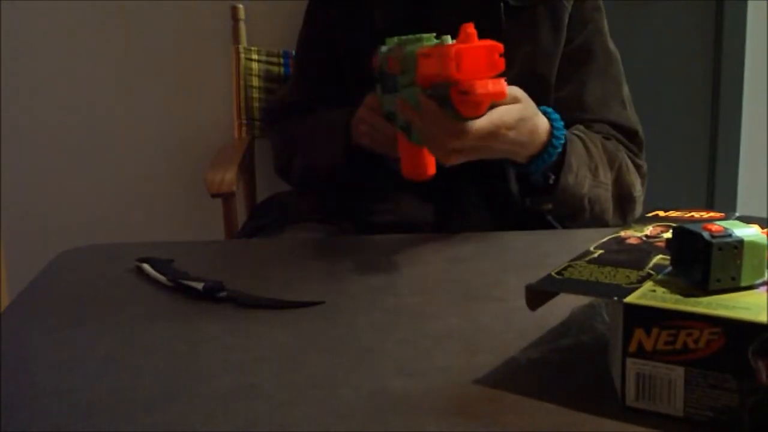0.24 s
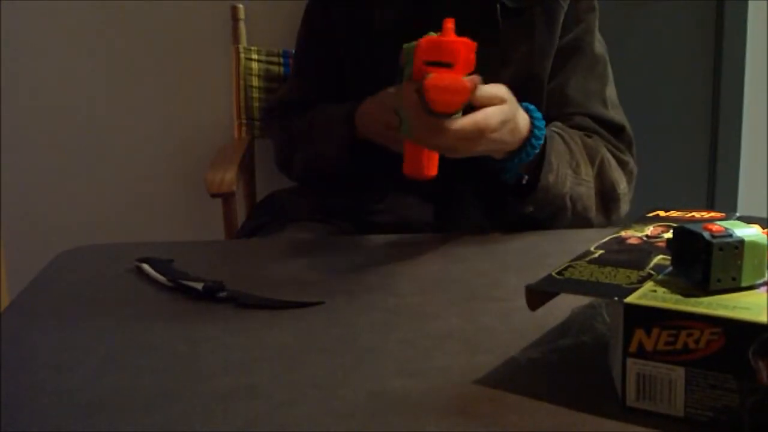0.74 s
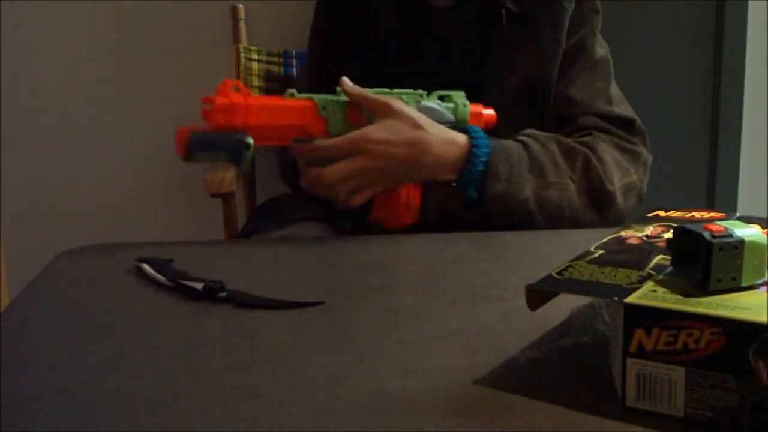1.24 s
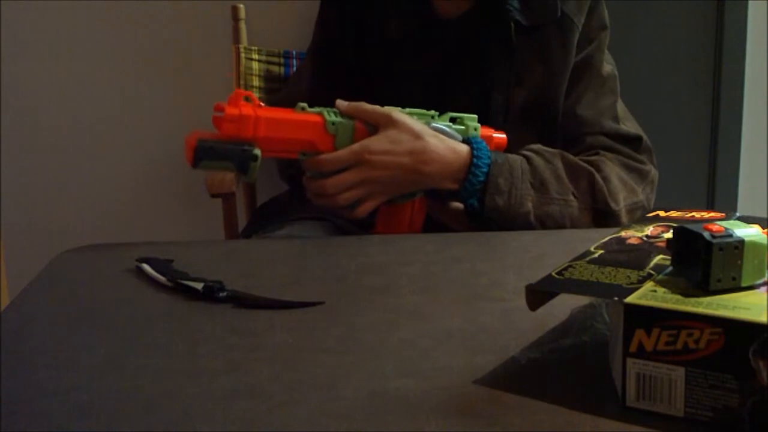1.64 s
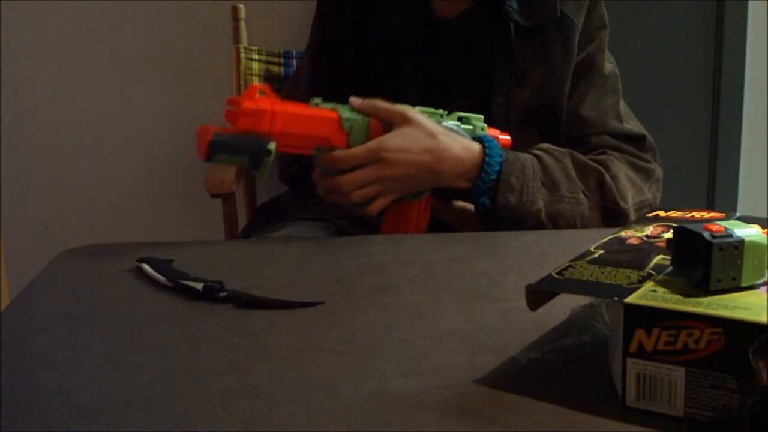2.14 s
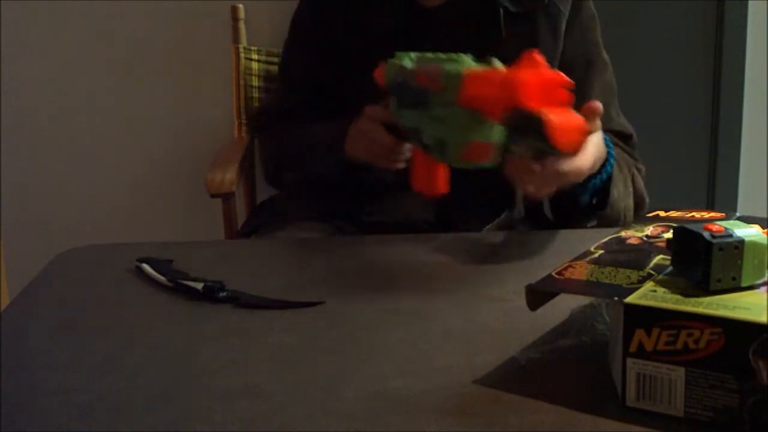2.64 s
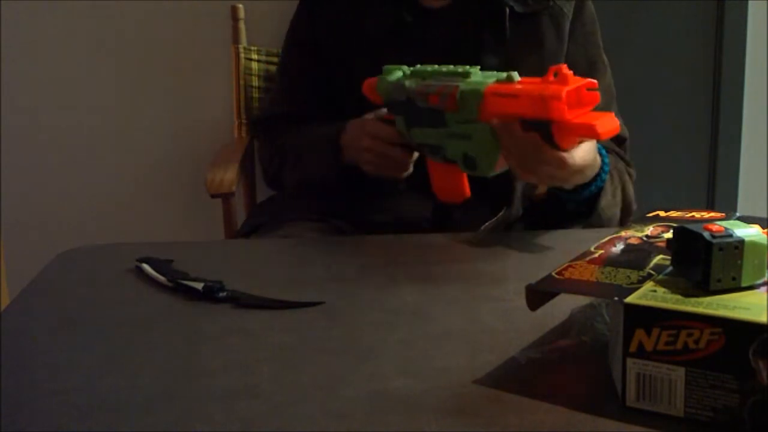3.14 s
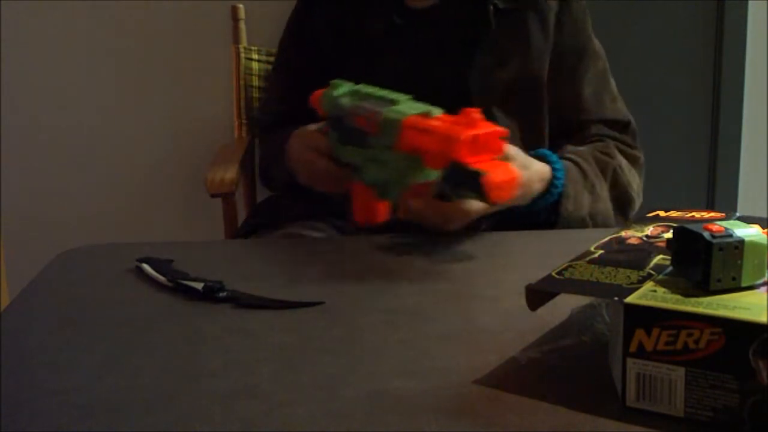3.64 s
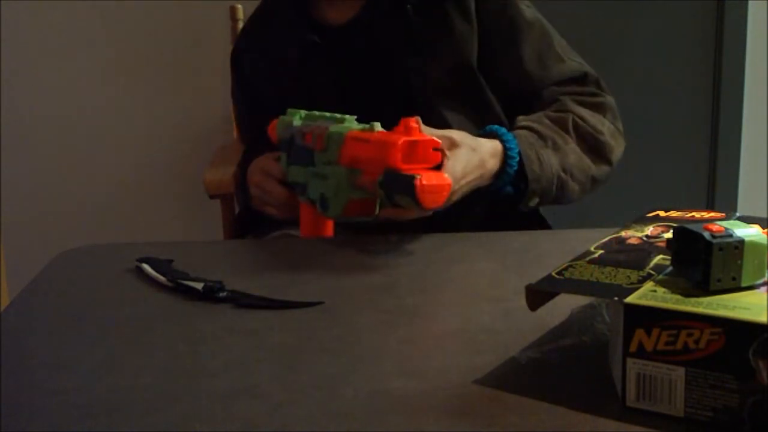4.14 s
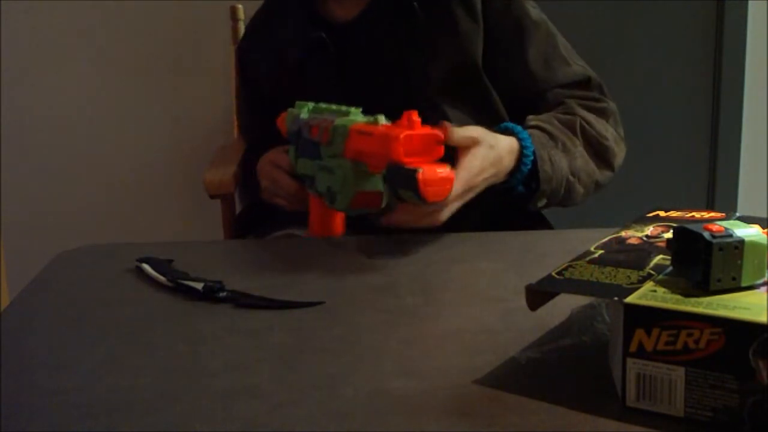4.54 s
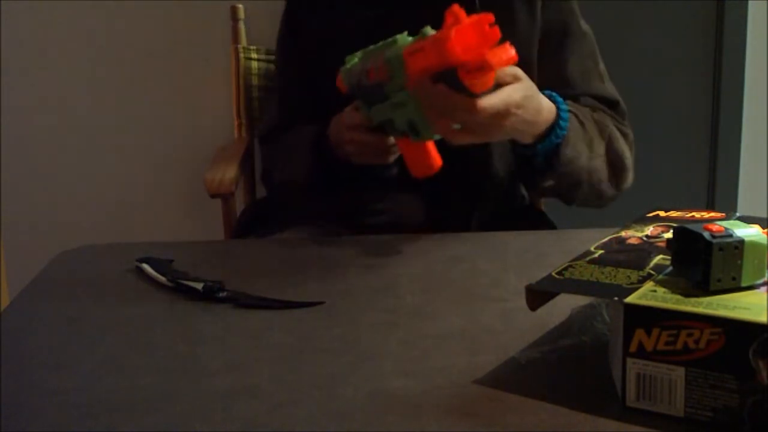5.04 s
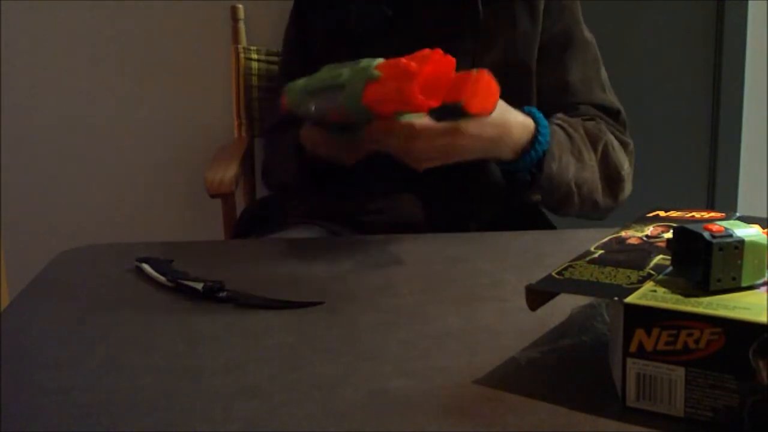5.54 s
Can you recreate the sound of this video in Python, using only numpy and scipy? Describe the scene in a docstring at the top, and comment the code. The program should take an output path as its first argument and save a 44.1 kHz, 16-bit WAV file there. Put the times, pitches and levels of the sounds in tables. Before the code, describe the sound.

A plastic toy blaster is cocked with scraping clacks and fired twice with sharp snaps, amid light clatter in a small room.

```python
"""Toy disc blaster in a small, bare room

A spring-powered plastic blaster is cocked and fired twice over a table, then cocked again. Its slide
scrapes along rails and clacks on its stops; each shot slams an arm home and the disc clatters down.
Furniture booms under a few dull bumps. Mains hum and room noise beneath; narrow-band microphone."""
import sys
import numpy as np
from scipy import signal
from scipy.fft import rfft, irfft, next_fast_len
from scipy.io import wavfile
from scipy.ndimage import map_coordinates

SR = 44100
rng = np.random.default_rng(int(sys.argv[2]) if len(sys.argv) > 2 else 0)


def unload_audio(sound):
    """Save the sound as a 16-bit wav file, at the path given as the first command line argument."""
    columns = np.transpose(np.atleast_2d(sound))
    # keep every value between -1 and 1, then stretch to whole-number steps
    steps = np.round(np.clip(columns, -1, 1) * 32767)
    wavfile.write(sys.argv[1], SR, steps.astype(np.int16))


N = 255457
TAIL_S = np.arange(SR * 2 // 3) / SR  # time axis of one impact

# slide drawn back: (stop time [s], travel [s], clack [dB], rub [dB], treble [dB], bass [dB])
PULL_STROKES = [(0.0619, 0.17, -20.5, -28.5, -3, -7), (.4569, 0.086, -26.5, -31, -2, -6),
                (3.1287, .19, -15, -31.5, -4.5, 2.5), (5.0111, 0.069, -13, -28, -3, -1.5)]
# slide rammed home: (stop time [s], travel [s], clack [dB], rub [dB], treble [dB], barrel ring [dB])
PUSH_STROKES = [(.640, 0.038, -13.5, -26, -1.5, -6.5), (3.4069, .073, -13, -24.5, -1.5, -2.5),
                (5.2484, .044, -14, -23.5, -1.5, -4)]


def shots(level_db, t60_s, spring_db, wet_db):
    """The catch lets go, the arm slams home and bounces; the spring rings on."""
    # trigger pulls: (release time [s], level [dB], arm flight [s], arm knock [dB])
    triggers = [(1.9042, -4, .0058, -1), (4.301, -4, .0072, -10)]
    # stiff arm on its stop: (frequency [Hz], level [dB], t60 [s])
    arm_modes = [(1350, -8, 0.0068), (1640, 8.5, 0.0093), (2050, 2, 0.0075), (2490, 0.5, 0.011),
                 (6190, -5.5, 0.04)]
    # spring and arm ringing: (frequency [Hz], level [dB], t60 [s])
    spring_modes = [(1120, -5, 0.075), (1140, -6.5, .12), (1460, -6, 0.047), (1665, -3, 0.17),
                    (1970, -19, 0.24), (2550, 2, 0.23), (3079, -4, .3), (3720, -8, .18), (3800, -3.5, .16),
                    (4400, -7, 0.17), (4400, -6, 0.27), (4510, 3.5, 0.26), (4642, -10, 0.15),
                    (6070, -19, 0.28), (6100, -8, .25)]
    # snap: (frequency [Hz], gain [dB])
    snap_spectrum = [(88, -23.5), (150, -10.5), (279, -8), (1030, -2), (1270, -3.5), (1600, -4),
                     (2250, -7.5), (2870, -6), (3550, -10), (3850, -9.5), (4760, -10.5), (6180, -8),
                     (7400, -13.5), (9620, -57), (16300, -120)]
    out = np.zeros(N)
    knock = unit_energy(sum(amp(db - 60 * TAIL_S / decay_s) * np.sin(2 * np.pi * hz * TAIL_S)
                            for hz, db, decay_s in arm_modes))  # one blow: all modes start in phase
    rise = attack(.0012)  # builds up through the shell
    for release_s, db, flight_s, arm_db in triggers:
        slam_s = release_s + flight_s
        contacts = [(release_s, -4, -10), (slam_s, 0, arm_db), (slam_s + .003, -8.5, -12)]
        for at_s, force_db, knock_db in contacts:
            snap = crack(t60_s, snap_spectrum, wet_db) + amp(spring_db) * ring(spring_modes, wet_db=-1.5)
            add(out, at_s, amp(db + force_db + level_db) * (snap * rise + amp(knock_db) * knock))
    return out


def slide_clacks(level_db, t60_s, shell_db, wet_db):
    """Plastic on plastic: a crack and a short shell ring; the forward slam sounds the barrel most."""
    # slide impact: (frequency [Hz], gain [dB])
    clack_spectrum = [(88, -37.5), (150, -3), (279, -19), (684, 2), (818, -1), (1130, -2.5), (2210, -6.5),
                      (2920, -6.5), (3380, -5), (4840, -11), (6180, -5), (7050, -15), (7400, -43),
                      (9620, -65.5), (16300, -120)]
    # hollow plastic shell: (frequency [Hz], level [dB], t60 [s])
    shell_modes = [(521, 0, 0.037), (676, -9.5, 0.08), (787, 3.5, .09), (914, -13, 0.038), (1110, -7, 0.14),
                   (1353, -0.5, 0.055), (1740, -10, 0.019), (1808, -6.5, 0.076), (2157, -2.5, 0.1),
                   (3300, -12, 0.1), (3730, -22, 0.073), (4666, -5.5, 0.04), (5470, -12, 0.14),
                   (5940, -6, 0.047)]
    # air in the barrel: (frequency [Hz], level [dB], t60 [s])
    barrel_modes = [(674, -7.5, 0.015), (762, -6, 0.073), (876, 6.5, 0.033), (907, 2, 0.063),
                    (970, 6, 0.03), (1080, -10.5, 0.013)]
    catch_s, catch_db = .024, -24.5  # ridden over ahead of the rear stop
    seat_s, seat_db = .0075, -5.5  # breech seats ahead of the front stop
    rebound_s, rebound_db, unlatch_db = .0063, -3.5, -26.5
    out = np.zeros(N)

    def strike(at_s, db, treble_db, bass_db, mid_db, barrel_db):
        """One contact of the slide."""
        hit = crack(t60_s, clack_spectrum, wet_db) + amp(shell_db) * ring(shell_modes, wet_db=-6)
        hit += amp(barrel_db) * ring(barrel_modes, wet_db=4)
        hit = coloured(hit, lambda hz: contact_tone_db(hz, bass_db, mid_db, treble_db))
        add(out, at_s, amp(db + level_db) * hit)

    for stop_s, _, db, _, treble_db, bass_db in PULL_STROKES:
        strike(stop_s - catch_s, catch_db, treble_db=-2.5, bass_db=-13.5, mid_db=-1, barrel_db=-22.5)
        strike(stop_s, db, treble_db, bass_db, mid_db=1.5, barrel_db=-19)
        strike(stop_s + rebound_s, db + rebound_db, treble_db, bass_db, mid_db=3, barrel_db=-17.5)
    for stop_s, travel_s, db, _, treble_db, ring_db in PUSH_STROKES:
        strike(stop_s - travel_s, unlatch_db, treble_db=-13, bass_db=-4, mid_db=4, barrel_db=-17.5)
        strike(stop_s - seat_s, db + seat_db, treble_db, bass_db=2.5, mid_db=4.5, barrel_db=ring_db)
        strike(stop_s, db, treble_db, bass_db=1.6, mid_db=-1.1, barrel_db=ring_db)
        strike(stop_s + rebound_s, db + rebound_db, treble_db, bass_db=-7.5, mid_db=4, barrel_db=ring_db)
    return out


def slide_scrape(level_db, slips_per_s, spread_db, rub_db, wet_db):
    """The slide rubs along its rails in tiny uneven slips, harder as it nears the stop."""
    # rail friction: (frequency [Hz], gain [dB])
    spectrum = [(180, -54), (300, -11), (595, -11), (788, -1), (964, -8), (1560, -13.5), (2460, -11.5),
                (2740, -13), (6050, -17.5), (6830, -17), (7400, -18), (9620, -55.5), (16300, -120)]
    swell_db, swell_power, overrun_s = 11.5, 1.57, .0071
    out = np.zeros(N)
    for stop_s, travel_s, _, db, treble_db, _ in PULL_STROKES + PUSH_STROKES:
        count = int((travel_s + overrun_s) * SR)
        slipping = rng.random(SR // 2) < slips_per_s / SR
        slip_size = amp(spread_db * rng.standard_normal(SR // 2))
        rub = rng.standard_normal(SR // 2)
        friction = unit_rms(slipping * slip_size * np.sign(rub)) + amp(rub_db) * rub
        scrape = coloured(friction, lambda hz: along(spectrum, hz) + contact_tone_db(hz, -4, 1.6, treble_db))
        ramp_db = swell_db * (np.linspace(0, 1, count) ** swell_power - 1)
        envelope = amp(level_db + db + ramp_db) * signal.windows.tukey(count, .15)
        add(out, stop_s - travel_s, in_room(unit_rms(scrape[:count]) * envelope, wet_db))
    return out


def contact_tone_db(hz, bass_db, mid_db, treble_db):
    """Tone balance set by the point of contact."""
    return along([(450, bass_db), (900, .007), (1600, mid_db), (2700, .0091), (4500, treble_db)], hz)


def clatter(level_db, t60_s, wet_db):
    """The disc bounces, the shell shifts in the hands: heavy parts knock, hard edges click."""
    # light contacts: (time [s], level [dB], knock [dB], brightness [dB])
    ticks = [(0.3568, -32, 5.5, 8), (2.224, -27, -22, 2.5), (2.3627, -33.5, -15, 7),
             (2.4429, -30.5, -18, -1), (2.5392, -39, -17, 4.5), (2.7737, -39, -5, 1.5),
             (2.8162, -33.5, -1, -2), (2.9042, -26.5, 5, 3.5), (3.8368, -38.5, -12, 3),
             (3.9123, -37.5, 9, -6), (4.5342, -29, -16.5, 6), (4.6843, -21, -8, 23), (4.8001, -18, 0, 8.5),
             (4.8057, -21.5, -5, 13), (4.9395, -36, -1, 3), (4.9667, -32, -18.5, -3)]
    out = np.zeros(N)
    for at_s, db, knock_db, bright_db in ticks:
        spectrum = [(120, knock_db - 7.5), (450, knock_db), (800, .68), (1500, -.81),
                    (2600, bright_db - 11), (4000, bright_db - 14.5),
                    (5500, bright_db - 18), (7000, bright_db - 22.5)]
        add(out, at_s, amp(db + level_db) * crack(t60_s, spectrum, wet_db) * attack(.0011))
    return out


def furniture_bumps(level_db, thud_db, t60_s, wet_db):
    """Soft blows set wooden furniture booming: a first touch, then the full weight."""
    # blows: (time [s], level [dB], bass [dB], settling time [s])
    bumps = [(.062, -39, 0, 0.018), (2.903, -28.5, 5.5, 0.022), (4.684, -17.5, -3.5, .016),
             (4.803, -32.5, 8.5, 0.015)]
    # furniture: (frequency [Hz], level [dB], t60 [s])
    wood_modes = [(229.3, -8.5, 0.71), (270, -8, 0.22), (338, 0, 0.087), (370, 3.5, 0.085), (423, -6, 0.13),
                  (480, -16, 0.13), (569, -9, 0.2), (692, -13.5, 0.22), (750, -18, .25), (898, -9.5, 0.26),
                  (996, -10.5, 0.38), (1095, -12.5, 0.27), (1370, -15.5, .08)]
    # thud: (frequency [Hz], gain [dB])
    thud_spectrum = [(90, -15.5), (160, -13), (230, -4.5), (380, -6.5), (600, -7.5), (850, -10),
                     (1500, -19.5), (4000, -40)]
    out = np.zeros(N)
    for touch_s, db, bass_db, settle_s in bumps:
        for at_s, force_db in [(touch_s, -2.5), (touch_s + settle_s, 0)]:
            boom = ring(wood_modes, wet_db=-18) + amp(thud_db) * crack(t60_s, thud_spectrum, wet_db)
            boom = coloured(boom, lambda hz: along([(160, bass_db), (330, .5), (600, 0), (1400, 1.5)], hz))
            add(out, at_s, amp(db + force_db + level_db) * boom * attack(.0007))
    return out


def background(air_db, hum_db, waver_db):
    """Soft room noise and the slightly unsteady hum of an appliance."""
    # room noise: (frequency [Hz], gain [dB])
    air_spectrum = [(12, -26.5), (20, -3), (54, -7.5), (69, -4), (125, -6), (148, -7), (312, -10.5),
                    (380, -13.5), (409, -22), (475, -24), (511, -20), (741, -14.5), (860, -17.5),
                    (1410, -24), (7400, -37.5), (9620, -73), (16300, -120)]
    # hum: (frequency [Hz], level [dB])
    hum_tones = [(81.5, -51.5), (119.5, -51), (413, -57), (473, -65.5), (726, -66)]
    t = np.arange(N) / SR
    air = unit_rms(coloured(rng.standard_normal(N + SR), lambda hz: along(air_spectrum, hz))[SR:])
    hum = np.zeros(N)
    for hz, db in hum_tones:
        peak = np.sqrt(2) * amp(db + waver_db * wobble(4.9))
        hum += peak * np.sin(2 * np.pi * hz * t + .69 * wobble(1.87))
    return amp(air_db) * air + amp(hum_db) * hum


def room_response():
    """Early wall echoes and a diffuse tail, drawn anew on each call."""
    # reverberation time: (frequency [Hz], t60 [s])
    decay = [(150, 0.78), (500, 0.68), (1400, 0.69), (3700, 0.56), (7000, 0.59)]
    # tail spectrum: (frequency [Hz], gain [dB])
    colour = [(150, -3.5), (400, 0.5), (650, 0), (900, -3), (1400, -1), (2500, -0.5), (4300, 4.5),
              (7000, -0.5)]
    hz, t, noise = signal.stft(rng.standard_normal(len(TAIL_S)), SR, nperseg=256)
    shape = amp(along(colour, hz)[:, None] - 60 * t / along(decay, hz)[:, None])
    tail = signal.istft(noise * shape, SR, nperseg=256)[1][:len(TAIL_S)] * attack(.0058)
    response = tail / np.linalg.norm(tail)
    echoes_s = rng.uniform(.0045, .026, size=8)
    response[(echoes_s * SR).astype(int)] += amp(-21.5) * rng.choice([-1, 1], size=8)
    return response


def in_room(x, wet_db):
    """x plus its reverberation."""
    return np.pad(x, (0, len(TAIL_S) - 1)) + amp(wet_db) * signal.fftconvolve(x, room_response())


def ring(modes, wet_db):
    """Decaying modes in the room, struck at new strengths each time."""
    hz, db, t60_s = np.transpose(modes)[:, :, None]
    db = db + 2 * rng.standard_normal(hz.shape)
    t = TAIL_S[:len(TAIL_S) // 2]
    tones = amp(db - 60 * t / t60_s) * np.sin(2 * np.pi * (hz * t + rng.random(hz.shape)))
    return unit_energy(in_room(tones.sum(axis=0), wet_db)[:len(TAIL_S)])


def crack(t60_s, spectrum, wet_db):
    """Dense, fast-dying response to a blow, with its wash in the room."""
    burst = unit_energy(rng.standard_normal(len(TAIL_S)) * amp(-60 * TAIL_S / t60_s))
    wash = amp(wet_db) * unit_energy(room_response())
    return unit_energy(coloured(burst + wash, lambda hz: along(spectrum, hz)))


def coloured(x, gain_db):
    """x through the minimum-phase filter with response gain_db(hz)."""
    size = 2 * next_fast_len(len(x) // 2 + 4096)
    gain = amp(gain_db(np.fft.rfftfreq(size, 1 / SR)))
    cepstrum = irfft(np.log(np.maximum(gain, 1e-6)))
    cepstrum[1:size // 2] *= 2
    cepstrum[size // 2 + 1:] = 0
    return irfft(rfft(x, size) * np.exp(rfft(cepstrum)))[:len(x)]


def attack(rise_s):
    """Exponential onset of an impact."""
    return 1 - np.exp(-TAIL_S / rise_s)


def wobble(rate_hz):
    """Smooth random curve with knots at rate_hz."""
    knots = rng.standard_normal(int(N * rate_hz / SR) + 4)
    return map_coordinates(knots, [np.arange(N) * rate_hz / SR])


def along(points, hz):
    """Interpolate (frequency [Hz], value) points on a log axis."""
    knots_hz, values = np.transpose(points)
    return np.interp(np.log(hz + 1), np.log(knots_hz + 1), values)


def amp(db):
    """dB to gain."""
    return 10 ** (np.asarray(db) / 20)


def unit_rms(x):
    """x at rms 1."""
    return x / np.sqrt(np.mean(x ** 2) + 1e-20)


def unit_energy(x):
    """x with the energy of 5 ms at rms 1."""
    return x / np.sqrt(np.sum(x ** 2) / (.005 * SR) + 1e-20)


def add(track, at_s, x):
    """Mix x into track from at_s."""
    first = round(at_s * SR)
    part, x = track[max(first, 0):], x[max(-first, 0):]
    part[:len(x)] += x[:len(part)]


def scene():
    """Mono mix of blaster, clatter, furniture and background."""
    mix = shots(level_db=-6.5, t60_s=.027, spring_db=-13.5, wet_db=-.8)
    mix += slide_clacks(level_db=-4, t60_s=.052, shell_db=-4, wet_db=-2)
    mix += clatter(level_db=.96, t60_s=.054, wet_db=-3.5)
    mix += slide_scrape(level_db=-1.05, slips_per_s=350, spread_db=1, rub_db=1, wet_db=-1.5)
    mix += furniture_bumps(level_db=-1, thud_db=3.5, t60_s=.27, wet_db=7)
    mix += background(air_db=-45.5, hum_db=2.5, waver_db=1.5)
    return mix[None]


def record(dry):
    """Lopsided microphone: loud bursts push its bias off and it drifts back; soft peaks, narrow band."""
    ceiling, top_hz = .85, 7080
    rectified = np.hypot(dry, .05) - .05
    bias = signal.sosfilt(signal.butter(1, [4, 16], "band", fs=SR, output="sos"), rectified)
    bias = signal.sosfilt(signal.butter(1, [2.2, 130], "band", fs=SR, output="sos"), bias)
    shifted = dry + amp(9.5) * bias
    rounded = shifted / (1 + np.abs(shifted / ceiling) ** 6) ** (1 / 6)
    size = next_fast_len(N + SR // 2)
    hz = np.fft.rfftfreq(size, 1 / SR)
    lowpass = 1 / np.sqrt(1 + (hz / top_hz) ** 110)
    return irfft(rfft(rounded, size) * lowpass, size)[..., :N]


dry = scene()
out = record(dry)
unload_audio(out)
```